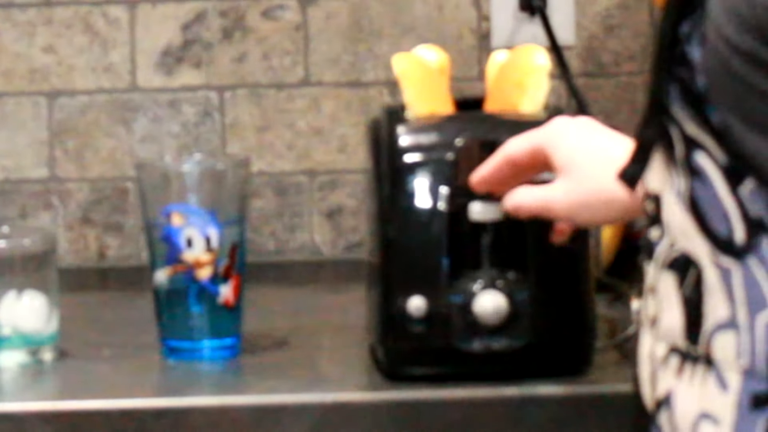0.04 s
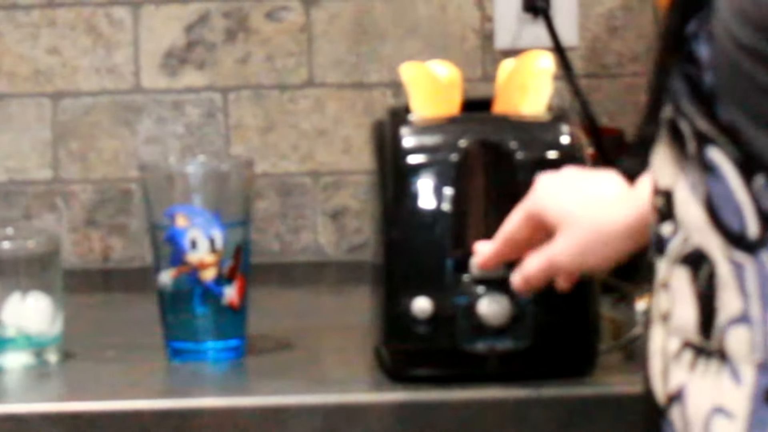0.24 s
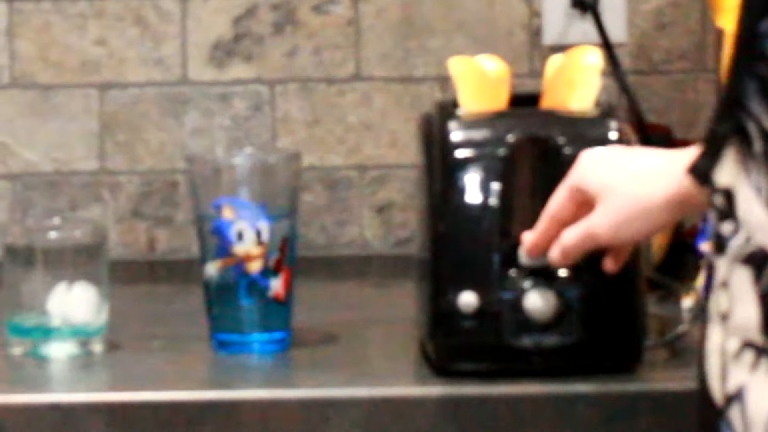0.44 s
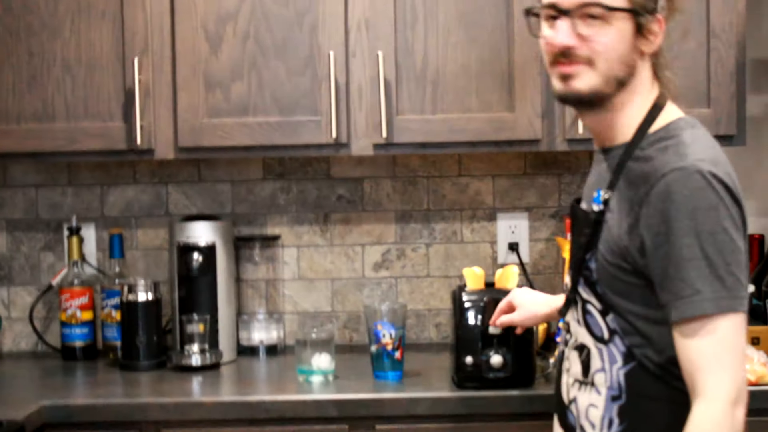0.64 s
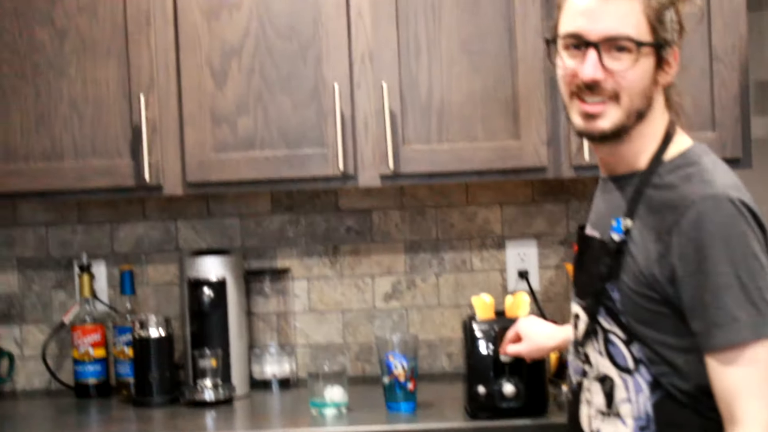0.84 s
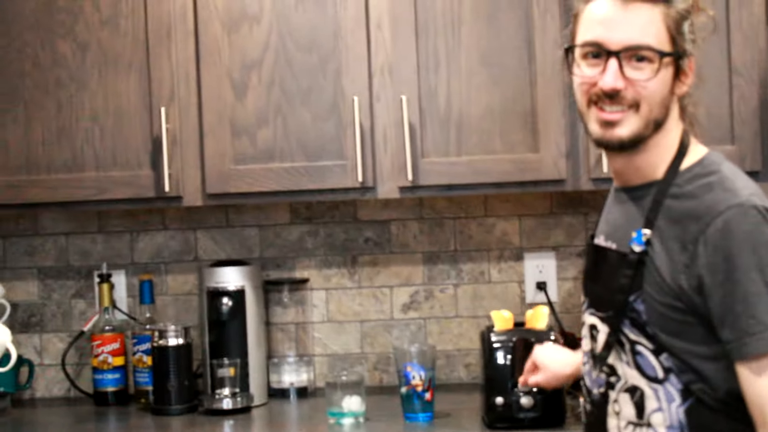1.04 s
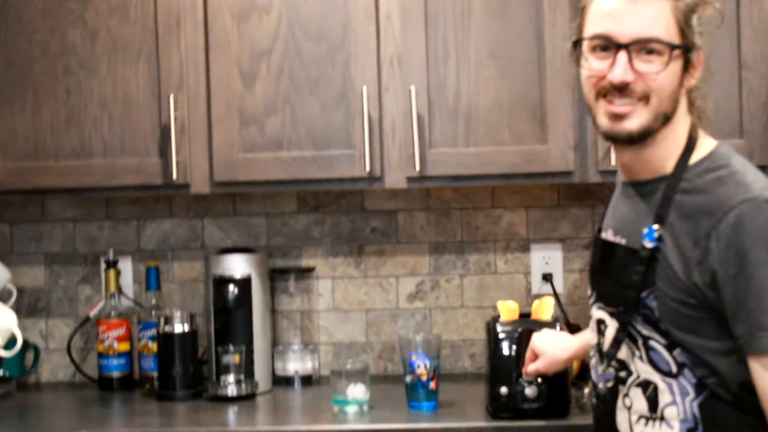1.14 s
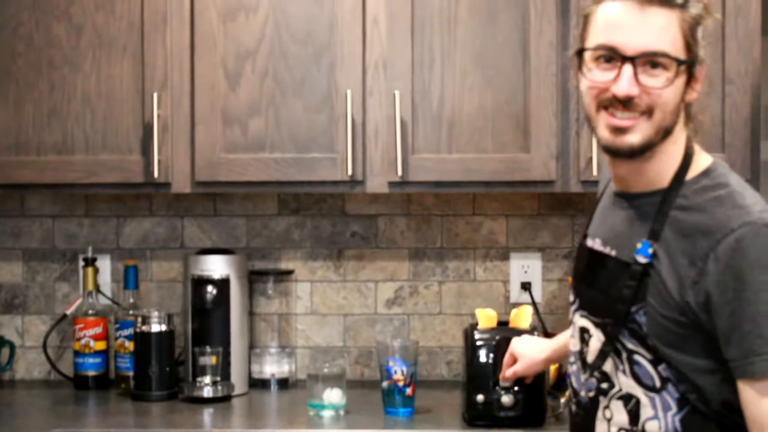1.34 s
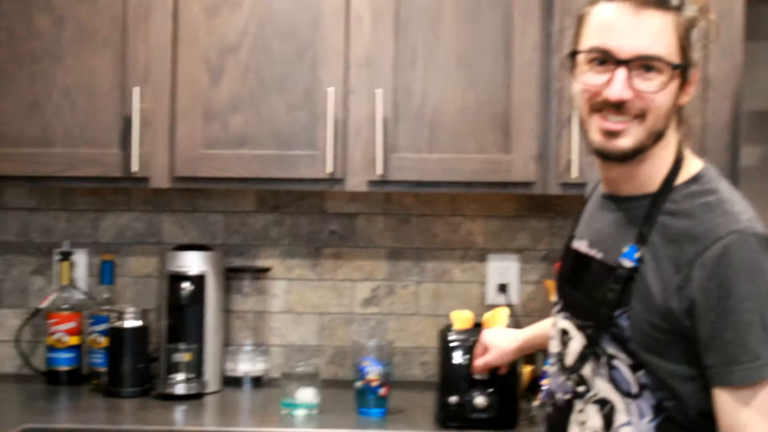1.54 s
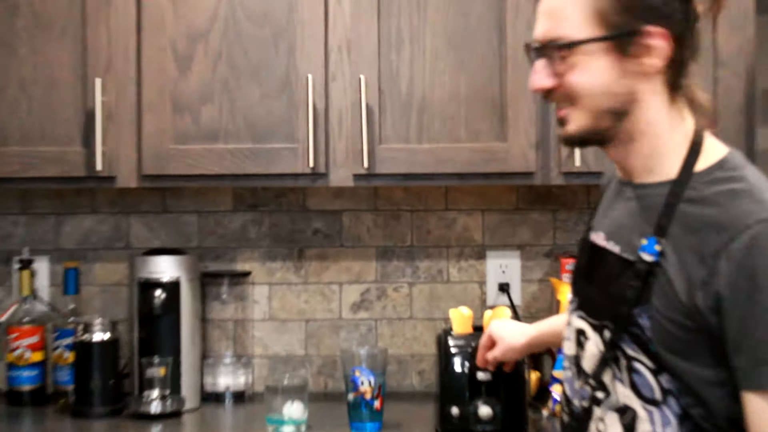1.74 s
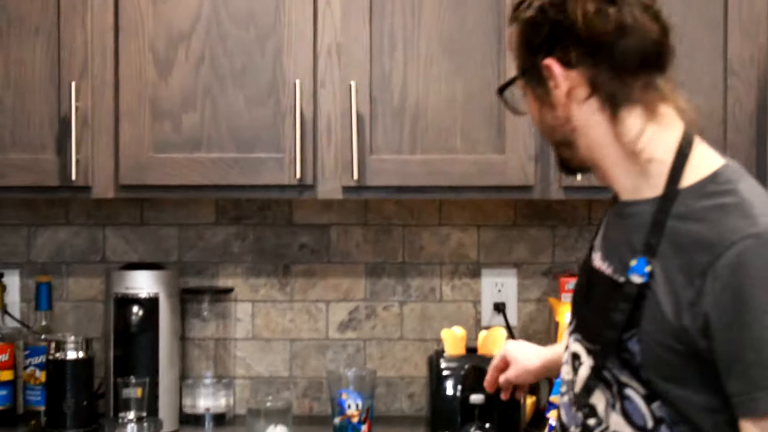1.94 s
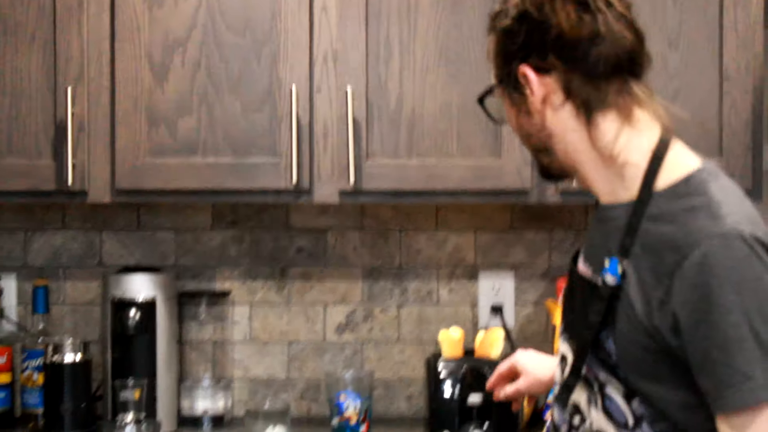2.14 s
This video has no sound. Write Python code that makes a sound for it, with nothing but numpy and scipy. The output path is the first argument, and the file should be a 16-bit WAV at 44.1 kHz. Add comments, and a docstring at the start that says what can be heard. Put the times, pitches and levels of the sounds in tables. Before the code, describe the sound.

A toaster lever slides down and clacks sharply at about 0.2 seconds, thumping the counter. It scrapes back up with a small squeak and clacks at 0.7. After a thin spring scrape, a second press clacks and thumps at 1.1 seconds, and the lever slides up to a last clack at 1.6. A low rumble and steady appliance hum continue throughout in the reverberant kitchen.

```python
"""A toaster that fails to latch

A toaster lever is pushed down twice and slides back up each time. Each clack is a quick run of impacts
that excites the modes of the sheet-metal carriage and the shell; the presses also thump the counter.
In between, sliding friction makes the carriage scrape and squeak on its guide, and the spring scrapes.
A hard, reverberant kitchen with a low rumble and a steady appliance hum surrounds it."""
import sys
import numpy as np
from scipy import signal
from scipy.fft import rfft, irfft, next_fast_len
from scipy.io import wavfile

SR = 44100
rng = np.random.default_rng(int(sys.argv[2]) if len(sys.argv) > 2 else 0)


def pcm_store(signal):
    """Save signal as 16-bit PCM."""
    levels = np.round(np.clip(np.atleast_2d(signal), -1, 1) * 32767)
    wavfile.write(sys.argv[1], SR, levels.astype(np.int16).T)


N = 97020
T = np.arange(N) / SR


def from_db(db):
    """Amplitude ratio of a level: tenfold per 20 dB."""
    return 10 ** (np.asarray(db) / 20)


def unit_energy(x):
    """Normalisation: the squared samples sum to one."""
    return x / np.sqrt(np.sum(x ** 2) + 1e-20)


def unit_rms(x):
    """Normalisation: the mean square is one."""
    return np.sqrt(len(x)) * unit_energy(x)


def at_hz(points, hz):
    """Linear interpolation over log frequency."""
    f, values = np.transpose(points)
    return np.interp(np.log(np.maximum(hz, 1)), np.log(f), values)


def decay(t, t60):
    """Exponential damping: 60 dB in t60 seconds."""
    return from_db(-60 * t / t60)


def colour(x, spectrum):
    """Minimum-phase filtering: folding the cepstrum makes the response causal."""
    size = next_fast_len(2 * N) // 2 * 2
    gain = from_db(at_hz(spectrum, np.fft.rfftfreq(size, 1 / SR)))
    cepstrum = irfft(np.log(gain))
    cepstrum[1:size // 2] *= 2
    cepstrum[size // 2 + 1:] = 0
    return irfft(rfft(x, size) * np.exp(rfft(cepstrum)))[:N]


def resonate(x, modes):
    """Modal superposition: each mode adds a damped resonance to the excitation."""
    out = x.copy()
    for hz, db, t60 in modes:
        radius = decay(1 / SR, t60)
        numerator = np.array([1, 0, -1]) * (1 - radius ** 2) / 2
        denominator = [1, -2 * radius * np.cos(2 * np.pi * hz / SR), radius ** 2]
        out += from_db(db) * signal.lfilter(numerator, denominator, x + 1e-18)
    return out


# Spectral density of the room noise: f/Hz, relative level/dB
RUMBLE_SPECTRUM = [(12, -16), (20, 5), (37, -3.5), (74, -0.5), (207, -13), (232, -14), (324, -11),
                   (352, -5.5), (382, -14), (534, -24), (811, -24), (881, -27), (958, -27.5), (4070, -42),
                   (15500, -54)]
def room_rumble(level_db=-44):
    """Spectral shaping weights white noise towards the bass."""
    hz = np.fft.rfftfreq(N, 1 / SR)
    gain = from_db(at_hz(RUMBLE_SPECTRUM, hz)) * (hz > 12)
    return from_db(level_db) * unit_rms(irfft(rfft(rng.standard_normal(N)) * gain, N))


# Partials of the appliance: f/Hz, rms level/dB
HUM_PARTIALS = [(119, -59), (240.5, -56.5), (316, -58.5), (355.3, -50), (533, -66), (3967, -78.5)]
def appliance_hum(waver_db=1.6):
    """A line spectrum with slow, random amplitude modulation of each partial."""
    out = np.zeros(N)
    for hz, db in HUM_PARTIALS:
        waver = np.interp(T, np.linspace(0, T[-1], 16), rng.standard_normal(16))
        amplitude = np.sqrt(2) * from_db(db + waver_db * waver)
        out += amplitude * np.sin(2 * np.pi * (hz * T + rng.random()))
    return out


BUILD_UP_S = 0.0042   # rise of reflections and chatter
# Reverberation time of the kitchen: f/Hz, T60/s
KITCHEN_T60 = [(150, 0.35), (500, 0.55), (1400, 0.56), (3700, 0.53), (6500, 0.42), (10000, 0.43),
               (15000, 0.43)]
def kitchen_response(direct_db=-14.5, early_db=-4.5, tail_db=-2.5):
    """Impulse response: direct sound, early reflections and a diffuse tail that decays band by band."""
    size = SR * 3 // 4
    t, hz = T[:size], np.fft.rfftfreq(size, 1 / SR)
    white = rfft(rng.standard_normal(size))
    edges_hz = np.geomspace(100, SR / 2, 13)
    tail = np.zeros(size)
    for low, high in zip(edges_hz, edges_hz[1:]):
        band = irfft(white * (hz >= low) * (hz < high), size)
        tail += band * decay(t, at_hz(KITCHEN_T60, np.sqrt(low * high)))
    early = rng.standard_normal(size) * decay(t, t60=0.13)   # off counter, tiles and cupboards
    build_up = 1 - np.exp(-t / BUILD_UP_S)
    return (from_db(direct_db) * (t == 0)
            + from_db(early_db) * unit_energy(early * build_up)
            + from_db(tail_db) * unit_energy(tail * build_up))


def in_kitchen(x):
    """Reverberation: convolution with the room's response from one radiating spot."""
    return signal.fftconvolve(x, kitchen_response())[:N]


# Blows of the rocking toaster on the counter: t/s, relative level/dB
THUMPS = [(0.233, 5.5), (.290, 5), (0.58, 2.5), (1.103, 6.5), (1.176, 1.5)]
# Modes of the counter: f/Hz, level/dB, T60/s
COUNTER_MODES = [(54.9, -38, 0.38), (121.7, -46.5, 0.56), (170, -40.5, 0.17)]
def counter_thumps():
    """Free vibration: each blow leaves the counter ringing in damped sinusoids."""
    out = np.zeros(N)
    for start, blow_db in THUMPS:
        age = np.maximum(T - start, 0)
        for hz, mode_db, t60 in COUNTER_MODES:
            out += from_db(blow_db + mode_db) * decay(age, t60) * np.sin(2 * np.pi * hz * age)
    return out


# Spectrum of dull rubbing: f/Hz, relative level/dB
RUB_SPECTRUM = [(400, -5), (850, 0), (1300, -3), (1800, -0.5), (2700, -8.5), (3600, -17), (8000, -24)]
def friction(modes, spectrum=RUB_SPECTRUM, catches_per_s=2500, spread_db=2):
    """Stick-slip friction: dense, tiny catches of random size excite the modes."""
    sizes = from_db(spread_db * np.minimum(rng.exponential(1, N), 4))
    signs = rng.choice([-1, 1], N)
    catches = sizes * signs * (rng.random(N) < catches_per_s / SR)
    return unit_rms(resonate(colour(catches, spectrum), modes))


# Thin scrape as the lever is gripped again: t/s, level/dB
SPRING_ENVELOPE = [(.68, -100), (.80, -58), (.88, -51.5), (.97, -64.5), (1.05, -57), (1.17, -100)]
def spring_scrape(hz=2640, resonance_db=20, t60=0.012):
    """Resonance concentrates the friction of the return spring in one narrow band."""
    envelope = from_db(np.interp(T, *np.transpose(SPRING_ENVELOPE)))
    return envelope * friction([(hz, resonance_db, t60)])


# Moments when the carriage sticks on the guide: t/s, level/dB
SQUEAKS = [(0.515, -42.5), (1.544, -51)]
# Squeaking modes of the guide: f/Hz, gain/dB, T60/s
SQUEAK_MODES = [(1197, 27, 0.033), (1430, 12, 0.016)]
def guide_squeaks(half_width_s=0.012):
    """Forced vibration: short swells of friction ring the guide near one pitch."""
    swells = sum(from_db(db) * np.exp(-((T - peak) / half_width_s) ** 2) for peak, db in SQUEAKS)
    return in_kitchen(swells * friction(SQUEAK_MODES))


# Friction of the moving carriage: t/s, hiss level/dB, rub level/dB
SLIDE_ENVELOPES = [(0, -63, -61.5), (0.154, -85, -75), (0.178, -45, -38), (.25, -45, -45.5),
                   (.40, -48, -70), (.47, -50.5, -50.5), (.52, -46, -60), (.56, -53.5, -55),
                   (.59, -49.5, -50.5), (.66, -51, -49.5), (.76, -59, -54.5), (.87, -54.5, -54.5),
                   (.95, -68.5, -66), (1.005, -61, -58), (1.025, -53.5, -52), (1.05, -53, -46),
                   (1.12, -42, -57), (1.41, -61.5, -58.5), (1.46, -46.5, -57.5), (1.51, -51, -52.5),
                   (1.54, -50.5, -51.5), (1.62, -61, -55), (1.65, -85, -79), (1.85, -100, -91)]
# Spectrum of the hiss: f/Hz, relative level/dB
HISS_SPECTRUM = [(1000, -39), (3000, -6.5), (4600, 1), (7200, -3), (9000, -9), (12000, -16.5), (15500, -39)]
# Modes of the guide rod: f/Hz, gain/dB, T60/s
GUIDE_MODES = [(1154, -6, 0.091), (2580, -0.5, 0.037), (6300, 9, 0.042), (6880, 4.5, 0.035),
               (7400, 5, 0.046), (14630, 6, .06)]
def carriage_slide():
    """Sliding friction drives the guide rod with a bright hiss and a duller rub."""
    times, hiss_db, rub_db = np.transpose(SLIDE_ENVELOPES)
    hiss = from_db(np.interp(T, times, hiss_db)) * friction(GUIDE_MODES, HISS_SPECTRUM)
    rub = from_db(np.interp(T, times, rub_db)) * friction(GUIDE_MODES, RUB_SPECTRUM)
    return in_kitchen(hiss) + in_kitchen(rub)


def chatter(t, tick_probability=0.15):
    """A decaying random impulse train: the fine rattle after a contact."""
    ticks = rng.standard_normal(len(t)) * (rng.random(len(t)) < tick_probability)
    build_up = 1 - np.exp(-t / BUILD_UP_S)
    return unit_energy(ticks * build_up * decay(t, t60=0.082))


# Frequency responses of the sheet metal, shell and base: f/Hz, gain/dB
METAL_RESPONSE = [(900, -33.5), (2200, -4.5), (3200, -3), (5000, -5), (6200, -3.5), (7600, -5.5),
                  (9800, -10), (12000, -15), (15500, -30)]
SHELL_RESPONSE = [(500, -36), (700, -10), (850, 1.5), (1200, -2), (1450, -3), (2100, 0), (3000, -6),
                  (6000, -24.5)]
BASE_RESPONSE = [(90, 1), (160, 0), (215, -13), (290, 2), (400, 5), (510, 8), (660, -11.5), (1200, -20.5)]
def clacks(contacts, modes, chatter_db=-4.5):
    """Impact excitation: each contact, with its own reflections and chatter, drives all three parts."""
    drives = np.zeros((3, N))
    for time, *part_db in contacts:
        start = int(time * SR)
        tick = kitchen_response()
        blow = (tick + from_db(chatter_db) * chatter(T[:len(tick)]))[:N - start]
        drives[:, start:start + len(blow)] += from_db(part_db)[:, None] * blow
    responses = (METAL_RESPONSE, SHELL_RESPONSE, BASE_RESPONSE)
    body = sum(colour(drive, response) for drive, response in zip(drives, responses))
    return resonate(body, modes)


# Carriage driven past the latch onto its bottom stop: t/s, metal level/dB, shell level/dB, base level/dB
PRESS_CONTACTS = [(.177, -7, -17, -26), (.203, 2, -23, -17), (.209, 7.5, -15, -1), (.218, 6.5, 11, -2.5),
                  (.228, 12, 7, 7.5), (.238, 2, 5.5, 9.5), (1.074, -6, -27, -16.5), (1.082, 8.5, 1.5, -7.5),
                  (1.090, 8, 11, 6.5), (1.101, 10, 11, 1.5), (1.112, -1.5, 5.5, 8)]
# It jogs upward and springs against its top stop: t/s, metal level/dB, shell level/dB, base level/dB
RETURN_CONTACTS = [(.580, -24, -15, -21), (.668, 5, -1, 0.5), (.677, 5.5, 0, -2), (.700, 0.5, -5, -4.5),
                   (1.532, -13.5, -12, -14), (1.635, 6.5, 6, -0.5), (1.649, 3.5, -3, -5)]
# Modes at each stop: f/Hz, gain/dB, T60/s
BOTTOM_STOP_MODES = [(293, 2, 0.05), (450, 1.5, 0.27), (497, 1.5, 0.089), (575, 4, 0.084),
                     (882, 1.5, 0.095), (1182, 4, 0.053), (1765, 0, 0.062), (2094, -0.5, 0.18),
                     (2724, 6, .15), (4355, 5, 0.041), (6140, 4.5, 0.024), (9130, -2, 0.012),
                     (14400, -10, 0.035)]
TOP_STOP_MODES = [(781, 8, 0.076), (882, 3.5, 0.14), (1158, 3.5, 0.042), (2470, 5, 0.3), (3120, -2.5, 0.13),
                  (3320, -4, 0.083), (6010, 2, 0.014), (7300, -19, .03), (14660, 11, .1),
                  (14770, 13, 0.089)]
def lever_clacks():
    """The point of impact selects the modes, so each stop has its own ring."""
    return clacks(PRESS_CONTACTS, BOTTOM_STOP_MODES) + clacks(RETURN_CONTACTS, TOP_STOP_MODES)


def scene():
    """Superposition of toaster, counter and background in one channel."""
    toaster = lever_clacks() + carriage_slide() + spring_scrape() + guide_squeaks()
    return (toaster + counter_thumps() + room_rumble() + appliance_hum())[None]


# Brief dips in level: t/s, gain/dB
LEVEL_DIPS = [(0.549, -18), (2.084, -16)]
def record(dry):
    """The level dips briefly twice, and an elliptic low-pass filter cuts the highest treble."""
    half_width_s, cutoff_hz = 0.003, 15700
    dips_db = sum(db * np.exp(-((T - centre) / half_width_s) ** 2) for centre, db in LEVEL_DIPS)
    low_pass = signal.ellip(12, 0.1, 80, cutoff_hz, fs=SR, output="sos")
    return signal.sosfilt(low_pass, dry * from_db(dips_db))


dry = scene()
out = record(dry)
pcm_store(out)
```